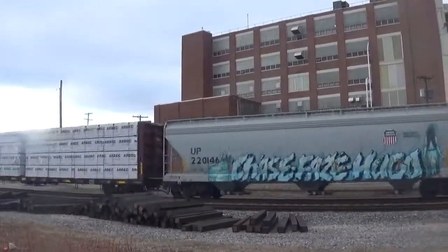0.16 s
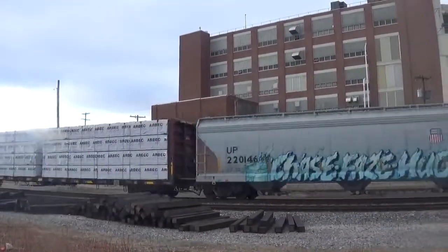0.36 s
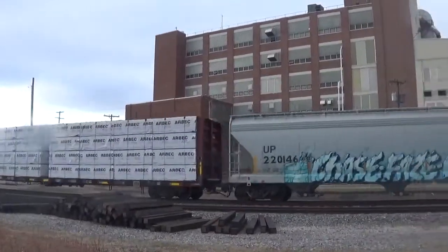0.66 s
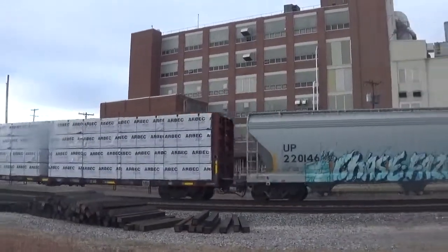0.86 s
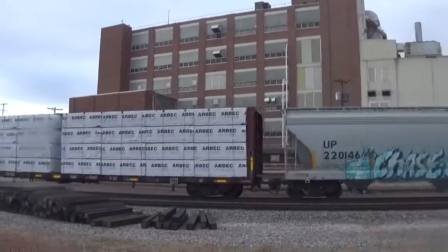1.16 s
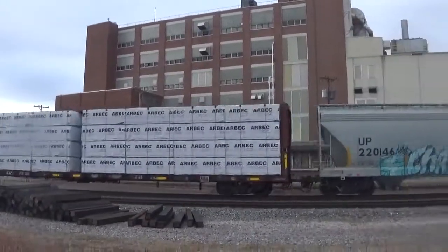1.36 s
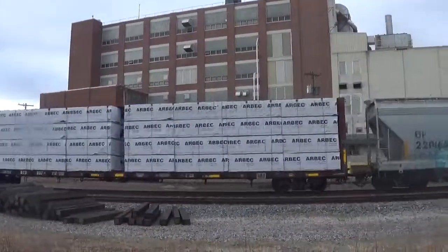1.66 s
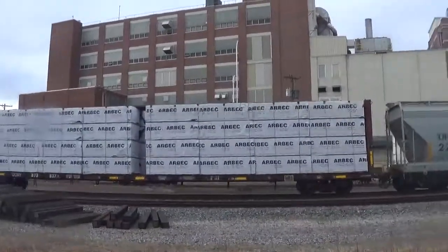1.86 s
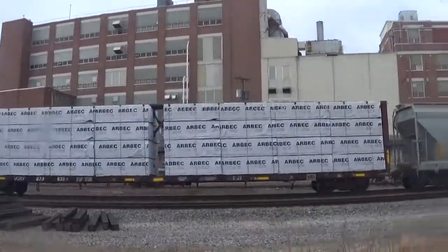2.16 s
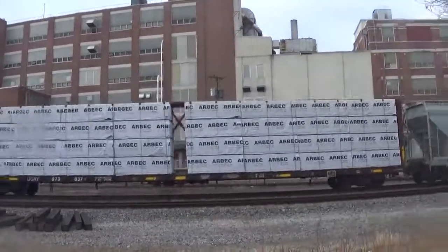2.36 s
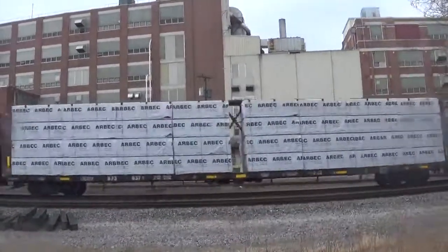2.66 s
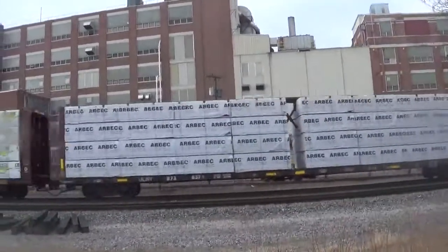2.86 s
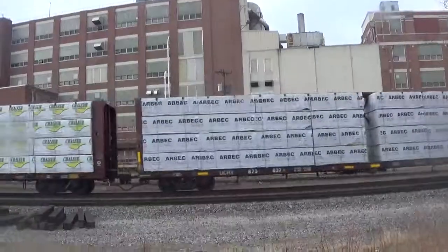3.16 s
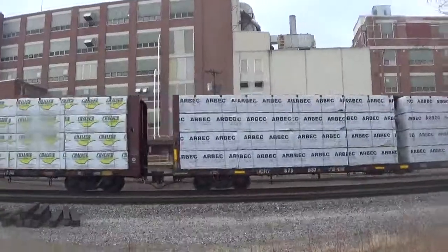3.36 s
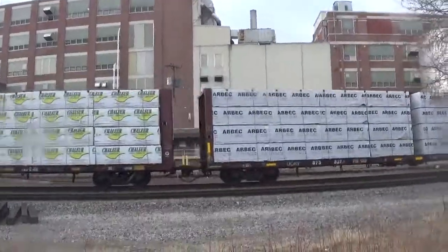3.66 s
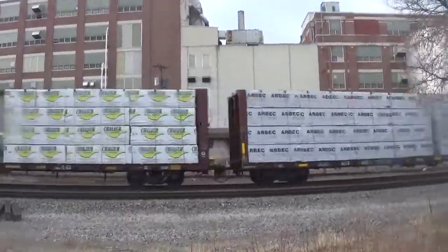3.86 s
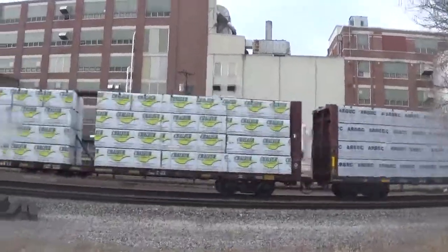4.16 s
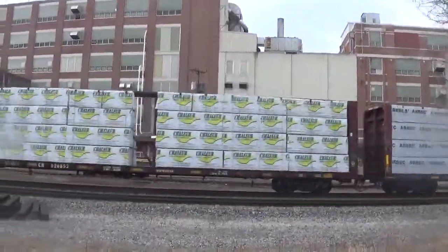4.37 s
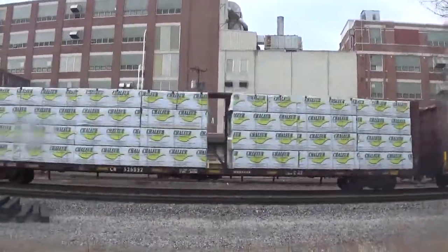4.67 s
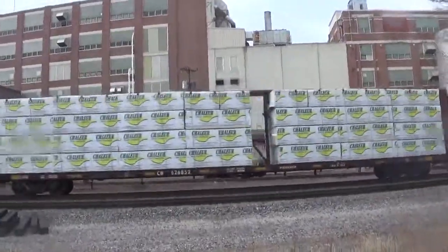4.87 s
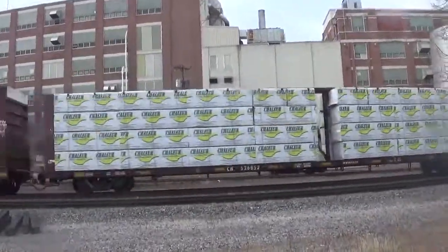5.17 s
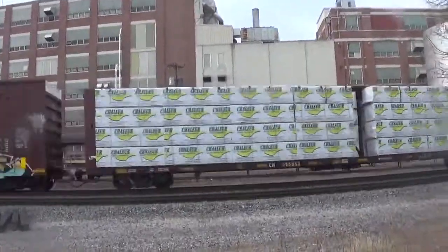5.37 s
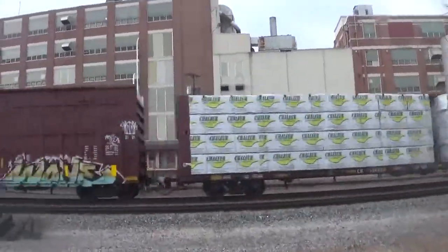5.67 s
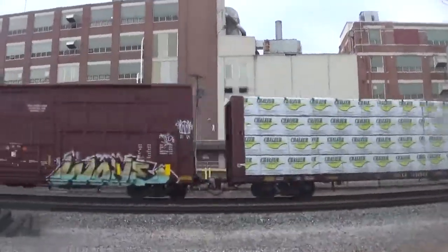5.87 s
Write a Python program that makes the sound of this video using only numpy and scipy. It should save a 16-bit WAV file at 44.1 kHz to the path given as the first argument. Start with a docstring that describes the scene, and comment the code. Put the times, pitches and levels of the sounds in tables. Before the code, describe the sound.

Close outdoor stereo pickup of a freight train rounding a curve. Flanges grind with bright metallic hiss while high squeals overlap and sink in pitch, including a thin whistle at the start and a piercing shriek before two seconds. The squealing then thins, leaving rumble and paired truck thuds around three seconds. Short squeals return near four, more thuds follow at five, and dense screeching ends it. A nearby wall adds a faint scattered echo.

```python
"""In front of a brick factory, freight cars roll round a curve, near a camera whose gain control ducks loud squeals.
Noise shaped by frequency makes the car rumble, the rail roar and the clunks of the trucks at a rail joint.
Wheel flanges grind along the rail: noise sent through the ringing resonances of the wheels.
Over this, wobbling tones make the squeals, most of them sinking as the wheels go by.
The factory wall answers the wheels with a short, scattered echo."""
import sys
import numpy as np
from scipy import signal
from scipy.fft import rfft, irfft, next_fast_len
from scipy.io import wavfile
from scipy.ndimage import uniform_filter1d, map_coordinates

SR = 44100
rng = np.random.default_rng(int(sys.argv[2]) if len(sys.argv) > 2 else 0)


def store_pcm(level_fs):
    """Save levels as 16-bit WAV."""
    pcm = np.round(np.clip(level_fs, -1, 1) * 32767).astype(np.int16)
    wavfile.write(sys.argv[1], SR, np.atleast_2d(pcm).T)


N = 264600

# tone of the rail's roar, also of the clanking truck parts: (frequency [Hz], level [dB])
RAIL_TONE = [(300, -38), (500, -5), (680, 2.5), (1050, 0.5), (1400, -4), (2000, -11), (3500, -49)]


def amp(db):
    """Turn decibels into gain."""
    return 10 ** (np.asarray(db) / 20)


def unit(x):
    """Scale a sound to an rms (average strength) of 1."""
    return x / np.sqrt(np.mean(np.abs(x) ** 2) + 1e-20)


def clock():
    """The time of every sample, in seconds."""
    return np.arange(N) / SR


def along(points, hz):
    """Read a (frequency, value) table at any frequency, on a log frequency axis."""
    f, v = np.transpose(points)
    return np.interp(np.log(hz + 1), np.log(f + 1), v)


def curves(rows):
    """Draw each column after the time as a curve with one value per sample."""
    s, *columns = np.transpose(rows)
    return [np.interp(clock(), s, column) for column in columns]


def wobble(rate, size=N):
    """A smooth random curve with `rate` random points a second."""
    knots = rng.standard_normal(4096)
    return map_coordinates(knots, [np.arange(size) * rate / SR], mode="wrap")


def filtered(x, response):
    """Multiply the spectrum of x by a function of frequency."""
    m = next_fast_len(N + SR // 4)
    gain = response(np.fft.rfftfreq(m, 1 / SR))
    return irfft(rfft(x, m) * gain, m)[..., :N]


def white():
    """Two unrelated white noises."""
    return rng.standard_normal((2, N))


def coloured(pair, spectrum, side_db):
    """Shape a middle and a side noise by a spectrum, then mix them to left and right with rms 1."""
    shaped = filtered(pair, lambda hz: amp(along(spectrum, hz)))
    mid, side = shaped * amp([[0], [side_db]])
    return unit(np.array([mid + side, mid - side]))


def swell(start, hold, attack, release):
    """Gain that rises, holds and dies; attack and release are the seconds taken for 20 dB."""
    t = clock() - start
    before = np.maximum(-t / attack, 0)
    after = np.maximum((t - hold) / release, 0)
    return amp(-20 * np.minimum(before + after, 10))


def factory(x):
    """The wall and the cars scatter the sound: a fading noise echo, 20 ms late, different at each ear."""
    # how long the echo rings: (frequency [Hz], time to fade by 60 dB [s])
    fade_times = [(100, 0.51), (2000, 0.16), (10000, 0.59)]
    hz, t, z = signal.stft(rng.standard_normal((2, SR // 2)), SR, nperseg=256)
    fade = amp(-60 * t / along(fade_times, hz)[:, None])
    tail = signal.istft(z * fade, SR, nperseg=256)[1]
    late = np.pad(x.mean(axis=0), (SR // 50, 0))[None]
    return signal.fftconvolve(late, tail / np.linalg.norm(tail[0]), axes=1)[:, :N]


def rolling():
    """Car bodies rumble and the rails roar under the rolling wheels: two noises rising and falling together."""
    # weight rolling by, heard as car rumble: (time [s], level [dB])
    rumble_levels = [(0, -27.5), (.3, -30.5), (.5, -27), (.8, -28), (1.4, -31), (1.8, -31.5), (2.1, -35),
                     (2.5, -33), (3.0, -30), (3.3, -32.5), (3.62, -29.2), (3.95, -31), (4.4, -29.5),
                     (4.65, -31.5), (5.02, -27.5), (5.35, -29), (5.62, -32), (5.85, -29), (6, -31)]
    # tone of the car bodies: (frequency [Hz], level [dB])
    car_tone = [(13, -42), (22, -12), (70, 0), (114, -1), (261, -0.5), (474, -12.5), (520, -16.5),
                (680, -23), (1140, -120)]
    usual_db, roar_under_db, roar_growth = -31.5, 7, 1.13  # the roar is softer but swings wider
    rumble_db, = curves(rumble_levels)
    roar_db = usual_db - roar_under_db + roar_growth * (rumble_db - usual_db)
    # the deepest rumble is the most alike on both sides
    side_levels = [(40, -11.0), (130, -1)]  # (frequency [Hz], level [dB])
    pair = filtered(white(), lambda hz: amp(np.outer([0, 1], along(side_levels, hz))))
    rumble = amp(rumble_db + 1.2 * wobble(14)) * coloured(pair, car_tone, side_db=-5.5)
    roar = amp(roar_db + 1.2 * wobble(24.8)) * coloured(white(), RAIL_TONE, side_db=-7.0)
    return rumble + roar


def clunks():
    """A wheel drops at the rail joint: the truck thuds and its loose parts clank, as dying bursts of noise."""
    # wheels dropping: (time [s], strength of the blow [dB], clank against the blow [dB])
    drops = [(3.09, -13.5, -20), (3.119, -14, -20), (3.705, -23.5, -5), (4.065, -21.5, -3.5),
             (4.099, -17.5, -9.5), (4.828, -17, -10), (5.03, -20, -10), (5.07, -14, -22), (5.113, -8, -24),
             (5.17, -26, -10)]
    # tone of the thud: (frequency [Hz], level [dB])
    thud_tone = [(25, -20), (70, 8), (150, 1.5), (320, 6.5), (480, -18.5), (900, -29)]
    thud, clank = np.zeros(N), np.zeros(N)
    for s, db, clank_db in drops:
        age = np.maximum(clock() - s + 0.0027, 0)  # each burst starts 2.7 ms before its listed time
        blow = amp(db) * (1 - np.exp(-age / .002))
        # the thud dies by 60 dB in 0.19 s, the clank in 0.3 s
        thud += blow * amp(-60 * age / 0.19)
        clank += blow * amp(clank_db - 60 * age / 0.3)
    frame = coloured(white(), thud_tone, side_db=-7)
    parts = coloured(white(), RAIL_TONE, side_db=-8)
    return amp(-7.0) * thud * frame + clank * parts


def pressure():
    """How hard the flanges press on the rail, in dB: bites added to light brushing, as powers."""
    # a flange bites the rail: (start [s], hold [s], release to fall 20 dB [s], pressure [dB])
    bite_rows = [(-.1, 0.38, .6, -3.8), (0.466, 0.12, .5, 1.8), (0.656, 0.86, 0.1, 3), (1.504, .55, 1.5, 0),
                 (2.097, 0.11, .88, -2.6), (2.702, .04, .1, -6.5), (3.72, 0.035, 0, -1.5),
                 (3.958, 0.11, 0.8, 1), (4.154, 0.14, 0, 0), (4.466, 0.053, 1.1, -5),
                 (4.648, .09, 1.1, -3.5), (4.84, 0.066, 0.5, -7), (5.29, 0.28, 5.5, 1.5),
                 (5.56, 0.36, 1, 1.5)]
    attack_s, brushing_db = .028, -16.8
    bites = sum((amp(db) * swell(s, hold, attack_s, release)) ** 2
                for s, hold, release, db in bite_rows)
    return 10 * np.log10(bites + amp(brushing_db) ** 2)


def wheel(modes, at_s, width_hz, patchy_db, fine_db, sink):
    """A rubbed wheel: noise with broad resonances, full of narrow ones that come and go; all sink in pitch."""
    hz, _, z = signal.stft(rng.standard_normal((2, N + SR)), SR, nperseg=4096)
    body = 1
    for f, db in modes:
        half_width = width_hz * np.sqrt(f / 4000) / 2  # width_hz is the width at 4000 Hz
        body = body + (amp(db) - 1) / (1 + ((hz - f) / half_width) ** 2)

    def blotches(bins, frames):
        """Random levels, smoothed over frequency and time."""
        over_hz = uniform_filter1d(rng.standard_normal(z.shape[1:]), size=bins, axis=0)
        return unit(uniform_filter1d(over_hz, size=frames, axis=1))

    patches, lines = blotches(11, 3), blotches(2, 7)
    gain = body[:, None] * amp(patchy_db * patches + fine_db * lines)
    ringing = signal.istft(z * gain, nperseg=4096)[1]
    # Doppler: the sound is stretched more and more; sink is the share of pitch lost a second
    passing = np.cumsum(1 - sink * (clock() - at_s))
    return np.array([map_coordinates(side, [passing], order=3) for side in ringing])


def rubbing():
    """The wheels of three trucks ring in turn, each truck drowning out the one ahead by a quick crossfade."""
    # resonances of each truck's wheels: (frequency [Hz], level over the scraping [dB])
    first_modes = [(1680, 7), (1960, 8.5), (2355, 5), (2780, 3.5), (2950, 2.5), (3310, 4), (3620, 4.5),
                   (4270, 8.5), (4770, 8.5), (5750, 4.5), (6290, 6.5), (6520, 6), (7790, 7), (8200, 4),
                   (8780, 4), (9750, 6)]
    second_modes = [(1620, 0.67), (1895, 9.8), (2260, 5), (2720, 9), (3310, 1.6), (3540, 5), (3930, 7.1),
                    (4500, 10.5), (5400, 6.7), (6330, 8.3), (6750, 2.1), (7300, 9.5), (7700, 3.3),
                    (8250, 8.8), (9160, 7.6), (10080, 2.7)]
    third_modes = [(1600, 1.4), (1810, 5.9), (1980, 5.5), (2210, 9.2), (2740, 10.5), (4050, 7.2),
                   (4565, 5.5), (4730, 2.6), (6250, 7.9), (7400, 3.8), (7920, 4.3), (8180, 5.2),
                   (9350, 2.9), (9650, 3), (9900, 4.3)]
    out = np.zeros((2, N))
    # (takes over [s], time at which its pitches are as listed [s], resonances)
    for start, at_s, modes in [(-1, 1.0, first_modes), (3.5, 4.7, second_modes), (5.5, 5.6, third_modes)]:
        share = np.clip((clock() - start) / 0.075 + .5, 0, 1)
        ringing = wheel(modes, at_s, width_hz=128, patchy_db=2.0, fine_db=4.5, sink=.016)
        out = np.sqrt(1 - share) * out + np.sqrt(share) * ringing
    return out


def grinding(pressure_db):
    """Flanges scrape the rail head; the chattering contact rings the wheels low, middle and high."""
    # low wheel ring, before a cut of 2 dB: (time [s], level [dB])
    ring_levels = [(0, -22.5), (.3, -29), (.65, -23.5), (.95, -18.5), (1.5, -30), (2.4, -28), (3.1, -28.5),
                   (3.5, -23), (3.85, -25.5), (4.12, -18.5), (4.35, -25.5), (5.35, -21), (6, -21.5)]
    # tone of the low ring: (frequency [Hz], level [dB])
    ring_tone = [(1300, -29), (1500, -2), (1700, -1.5), (2100, -2.5), (2950, 1), (3400, -7), (4200, -20.5)]
    # tone of the middle scrape: (frequency [Hz], level [dB])
    scrape_tone = [(2700, -24), (3350, -4), (4500, 2.5), (6500, 1), (7300, 0), (8100, -20.5), (9500, -55)]
    # tone of the high hiss: (frequency [Hz], level [dB])
    hiss_tone = [(6900, -34), (7650, -1), (8400, 3), (9700, -0.5), (10400, -1.5), (11000, -4)]
    ring_db, = curves(ring_levels)
    # harder pressing lifts the scrape less than the hiss
    scrape_db = -21.5 + 0.65 * pressure_db
    hiss_db = -19 + pressure_db
    steel = rubbing()
    chatter_db = 0.82 * wobble(60)
    ring = amp(ring_db - 2.0 + chatter_db) * coloured(steel, ring_tone, side_db=-7.5)
    scrape = amp(scrape_db + chatter_db) * coloured(steel, scrape_tone, side_db=-8)
    hiss = amp(hiss_db + 1.2 * wobble(40)) * coloured(steel, hiss_tone, side_db=-12.5)
    return ring + scrape + hiss


def stick_slip(hz, rough, flutter_hz):
    """One wheel tone kept going by stick and slip; uneven slips shake its size and phase. Rms 1."""
    shake = wobble(flutter_hz, size=len(hz)) + 1j * wobble(flutter_hz, size=len(hz))
    spin = np.exp(2j * np.pi * np.cumsum(hz) / SR)
    return unit(np.real((1 + rough * shake) * spin))


def squeals(db, sink, spread_db):
    """Short, rough squeals: each swells and lets go, sinking in pitch as its wheel passes."""
    # squeals, before the shared boost db: (start [s], hold [s], pitch mid-hold [Hz], level [dB])
    squeal_rows = [ (0, 0.06, 8130, -21.5), (0, 0.067, 2000, -32), (0.049, 0.3, 6210, -29),
                   (0.496, .25, 6290, -27.5), (0.497, .4, 8310, -23), (.55, 0.28, 8860, -32),
                   (.8, 0.14, 1997, -25), (.81, .08, 4700, -27), (1.001, 0.17, 3604, -27.5),
                   (1.07, 0.28, 2360, -29), (1.12, 0.35, 8160, -22.5), (1.298, 0.22, 4280, -24.5),
                   (1.36, .14, 8670, -25), (1.4, .14, 4470, -26.5), (1.461, .12, 7750, -23),
                   (1.36, .3, 6250, -28), (1.56, .38, 9950, -27), (1.79, 0.13, 4244, -23),
                   (1.92, .2, 5389, -27), (1.918, .3, 2357, -31), (1.978, .27, 9640, -26),
                   (2, 0.069, 8100, -24), (2.16, .12, 4838, -28), (2.263, 0.04, 6270, -26),
                   (1.98, 0.16, 4250, -32), (2.56, 0.22, 2776, -33.5), (2.99, .13, 4530, -34),
                   (3.519, 0.36, 2290, -37), (3.74, 0.072, 7410, -29.5), (3.96, 0.06, 10160, -24),
                   (3.96, .2, 8380, -32), (4.081, 0.25, 7750, -23.5), (4.17, 0.053, 10170, -24),
                   (4.38, 0.11, 1910, -32), (4.63, 0.14, 1880, -28), (4.465, 0.089, 6360, -26.5),
                   (4.47, 0.048, 4515, -26), (4.58, 0.15, 4485, -25.5), (4.7, .07, 3540, -27.5),
                   (4.76, 0.16, 9200, -33), (4.84, 0.12, 8230, -30), (4.86, 0.17, 2700, -35),
                   (5.3, 0.32, 1988, -26.5), (5.31, 0.068, 1582, -28), (5.36, 0.43, 1810, -28.5),
                   (5.45, 0.18, 4050, -29), (5.5, 0.46, 8150, -23), (5.62, 0.178, 7920, -20.5),
                   (5.67, 0.177, 4000, -23.5), (5.64, 0.187, 5040, -27.5), (5.68, 0.1, 2670, -25),
                   (5.88, 0.1, 3360, -23.5), (5.87, 0.12, 4500, -25), ]
    attack_s, release_s, arch_db = .08, 0.17, 2  # times for 20 dB; bulge of the held note
    out = np.zeros((2, N))
    for start, hold, hz, level_db in squeal_rows:
        gain = swell(start, hold, attack_s, release_s)
        span = gain > .01  # only the audible part
        t = clock()[span] - start - hold / 2
        place = amp(spread_db * rng.standard_normal() * np.array([[.5], [-.5]]))  # random left-right place
        level = amp(db + level_db - arch_db * (2 * t / hold) ** 2)
        tone = stick_slip(hz * (1 - sink * t), rough=0.44, flutter_hz=95.4)
        out[:, span] += place * level * gain[span] * tone
    return out


def locked_squeal(rows, db, rough):
    """A flange pressed hard: a single wheel tone takes over and holds a long note, clean or rough."""
    hz, level_db = curves(rows)
    since_start, until_end = clock() - rows[0][0], rows[-1][0] - clock()
    inside = np.clip(np.minimum(since_start, until_end) / 0.019 + 1, 0, 1)  # 19 ms fades outside the ends
    return inside * amp(level_db + db) * stick_slip(hz, rough, flutter_hz=133.4)


def long_notes():
    """Wheels locked into one note: a high clean whistle, a lower clean shriek and a long rough song."""
    # high whistle, before a boost of 3 dB: (time [s], pitch [Hz], level [dB])
    whistle_rows = [(0.0, 8007, -26), (0.08, 7970, -25), (0.204, 7990, -12.5), (0.26, 7990, -22),
                    (0.5, 7929, -31)]
    # lower shriek, before a boost of 1.5 dB: (time [s], pitch [Hz], level [dB])
    shriek_rows = [(1.45, 4750, -26), (1.65, 4730, -18.5), (1.73, 4720, -7.5), (1.87, 4726, -10),
                   (2.02, 4694, -24.5)]
    # one wheel singing on and on, before a cut of 1 dB: (time [s], pitch [Hz], level [dB])
    singing_rows = [(.25, 4830, -46), (.4, 4822, -15.5), (.5, 4815, -32), (.65, 4810, -19.5),
                    (1.15, 4780, -32.5), (1.32, 4750, -17), (1.6, 4760, -35), (2.0, 4730, -26),
                    (2.2, 4710, -23), (2.45, 4654, -35.5), (3.7, 4616, -34.5)]
    whistle = locked_squeal(whistle_rows, db=3.0, rough=0.11)
    shriek = locked_squeal(shriek_rows, db=1.5, rough=0.11)
    singing = locked_squeal(singing_rows, db=-1, rough=0.3)
    return whistle + shriek + singing


def scene():
    """The grinding and squealing wheels, placed along the track, over the rolling train."""
    # where the loudest wheels are: (time [s], left over right [dB])
    bearings = [(0.0, 0.5), (0.22, -3), (0.62, 0.5), (2.14, -3.5), (2.81, -1.0), (2.96, -3.5), (3.59, -1),
                (5.21, -4), (5.31, 1.5), (6.0, -1.5)]
    pressure_db = pressure()
    wheels = grinding(pressure_db) + squeals(db=2.0, sink=.022, spread_db=2.0) + long_notes()
    wheels = wheels * amp(curves(bearings)[0] * np.array([[.5], [-.5]]))
    left, right = wheels + amp(-14.0) * factory(wheels) + rolling() + clunks()
    # hard rubbing comes from one spot, so pressure narrows the stereo width
    width_db = -1.5 - 0.29 * pressure_db
    mid = (left + right) / 2
    side = (left - right) / 2 * amp(width_db)
    return np.array([mid + side, mid - side])


def record(dry):
    """The camera turns everything down under a loud squeal and keeps nothing above its band limit."""
    knee_db, squeeze, average_s, top_hz = -17.8, 0.65, 0.042, 11050  # squeeze: share of the excess removed
    power = np.abs(uniform_filter1d(np.mean(dry ** 2, axis=0), size=int(average_s * SR)))
    excess_db = np.maximum(10 * np.log10(power + 1e-12) - knee_db, 0)
    return filtered(dry * amp(-squeeze * excess_db), lambda hz: hz < top_hz)


dry = scene()
out = record(dry)
store_pcm(out)
```